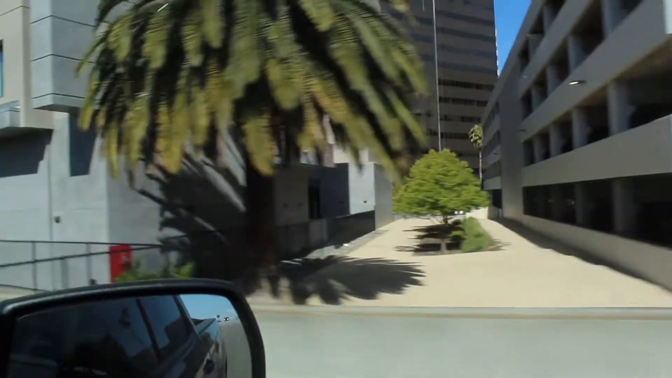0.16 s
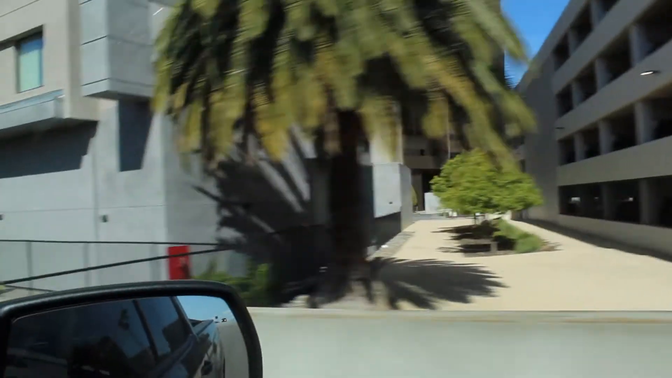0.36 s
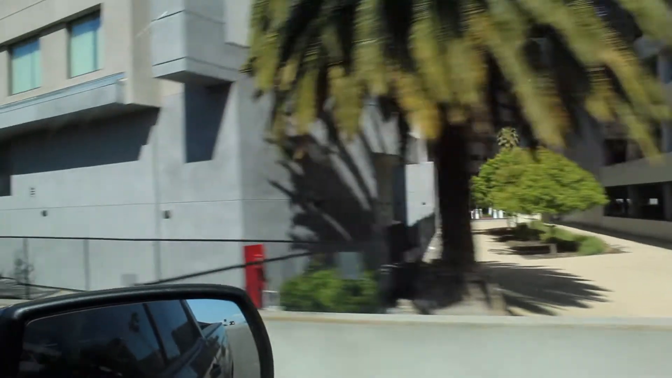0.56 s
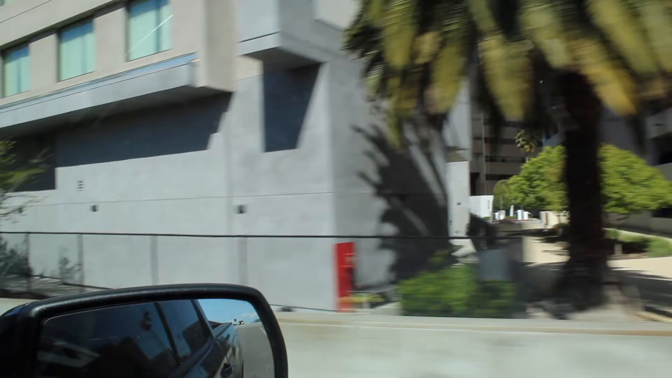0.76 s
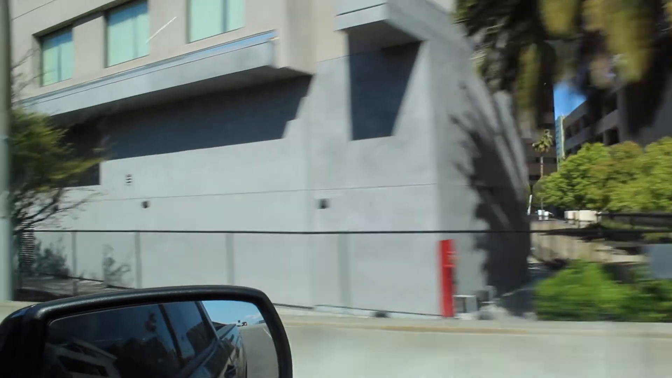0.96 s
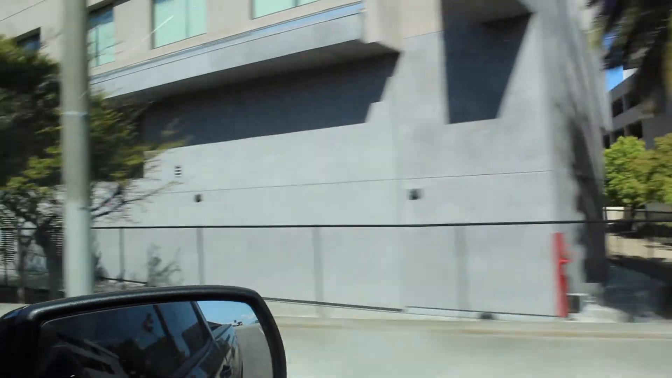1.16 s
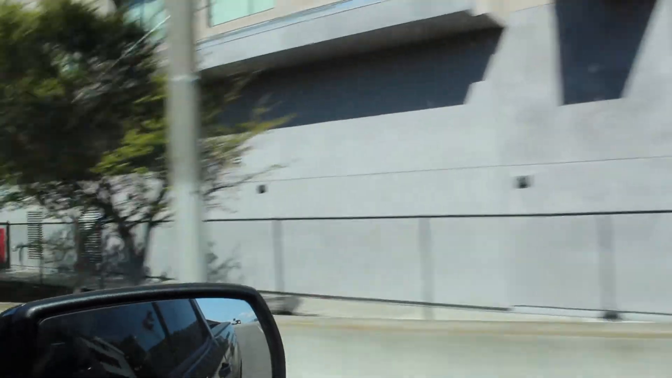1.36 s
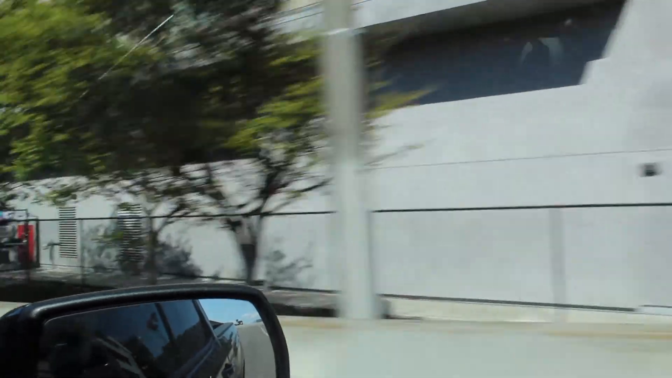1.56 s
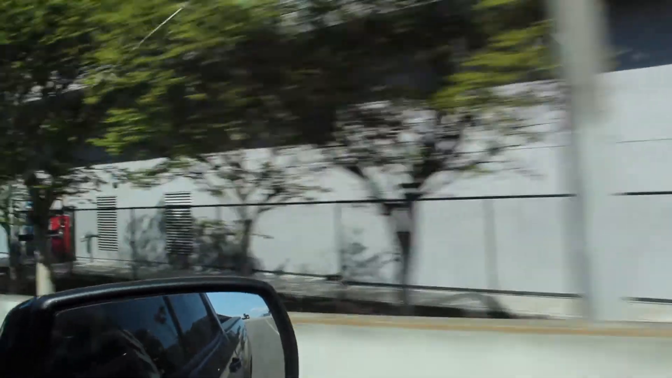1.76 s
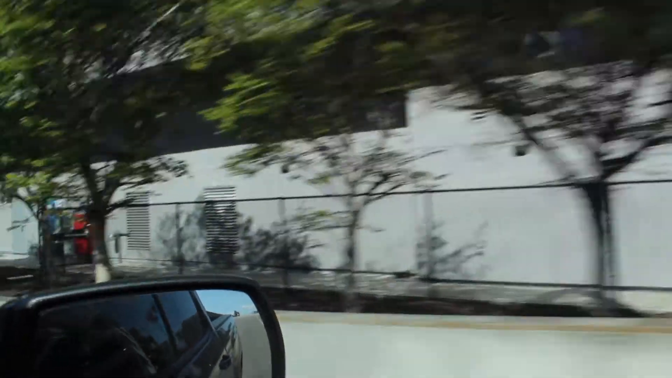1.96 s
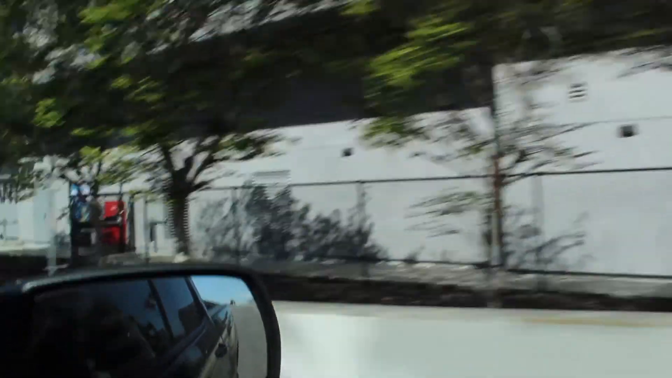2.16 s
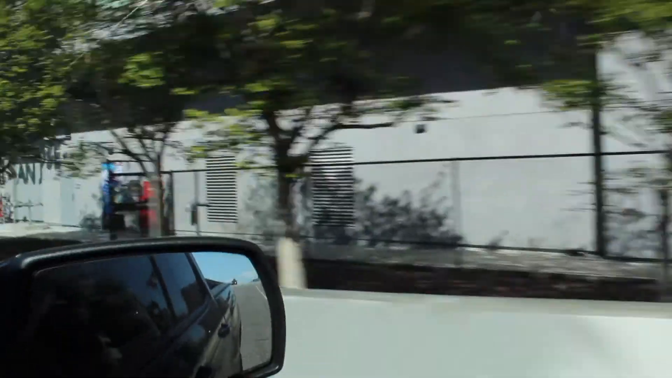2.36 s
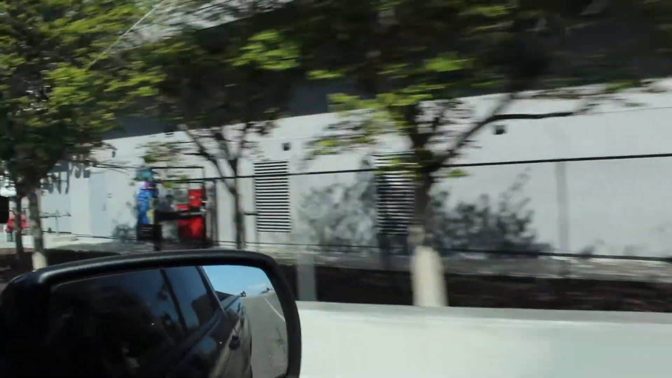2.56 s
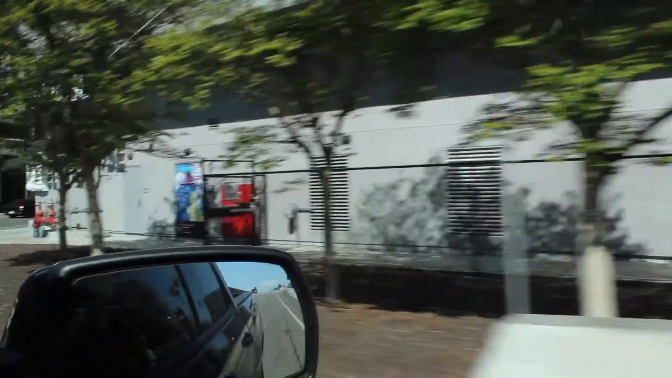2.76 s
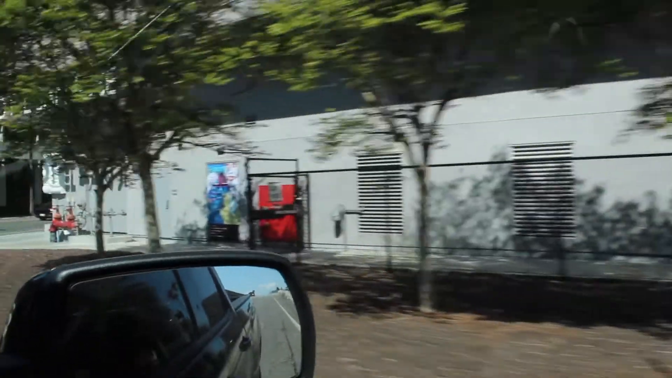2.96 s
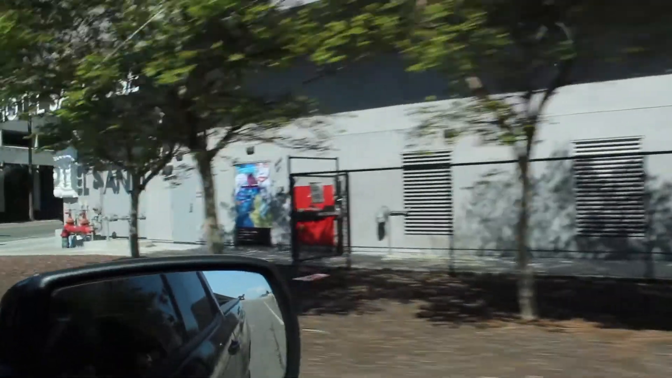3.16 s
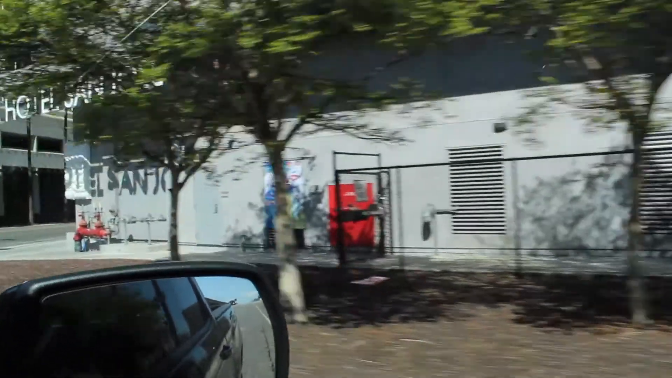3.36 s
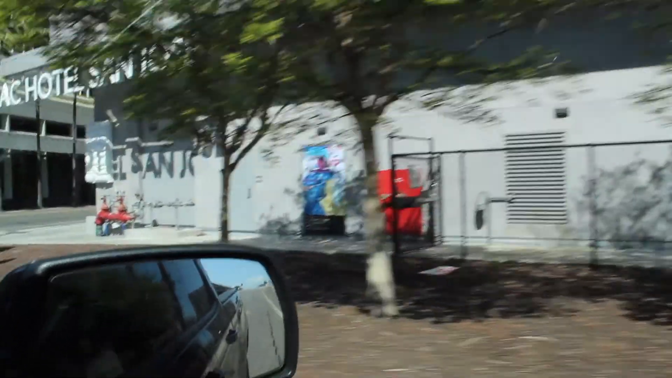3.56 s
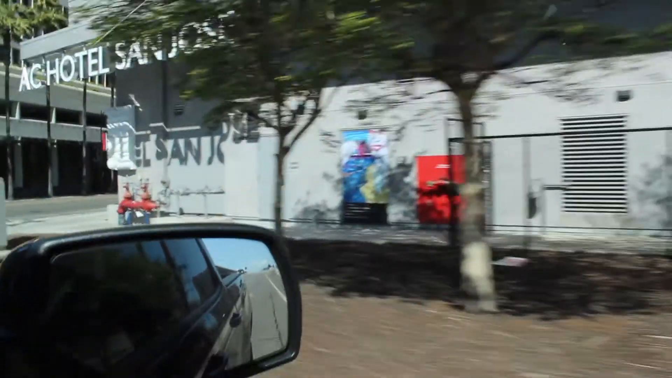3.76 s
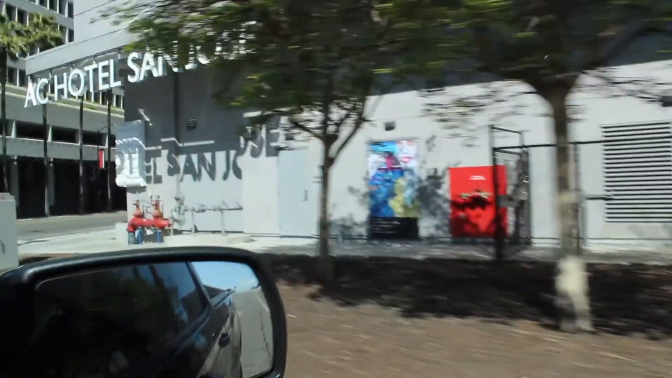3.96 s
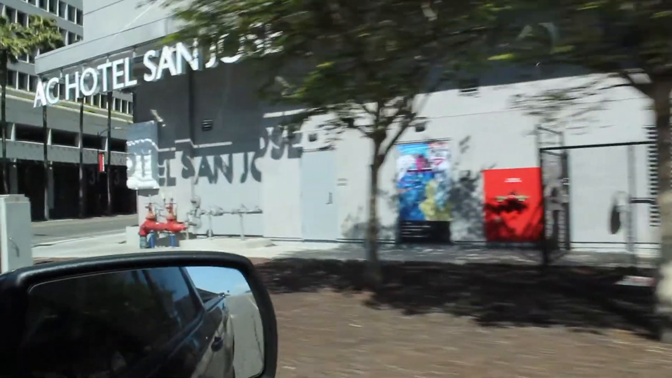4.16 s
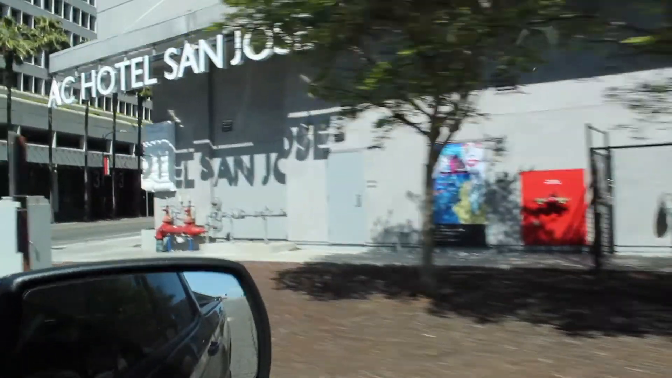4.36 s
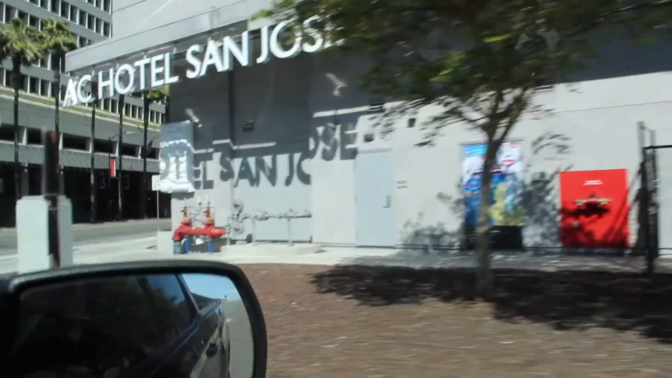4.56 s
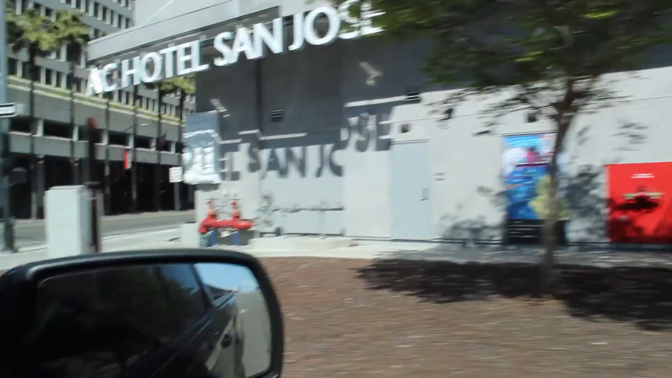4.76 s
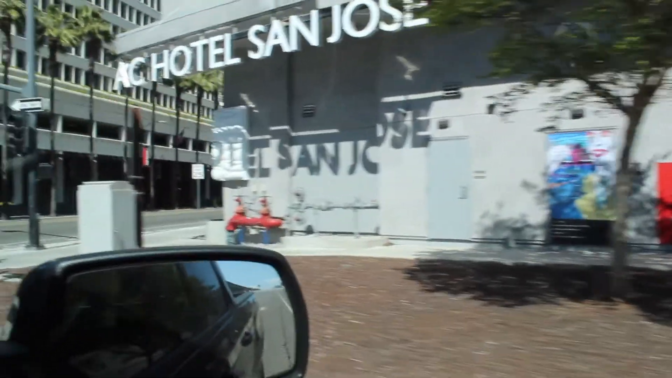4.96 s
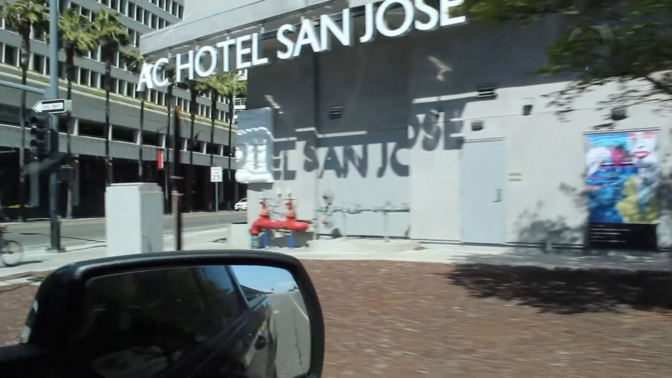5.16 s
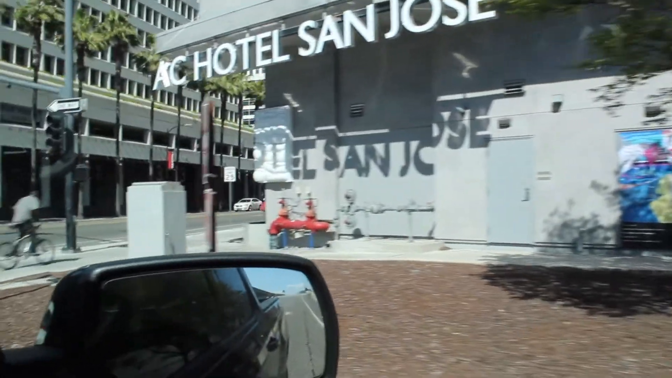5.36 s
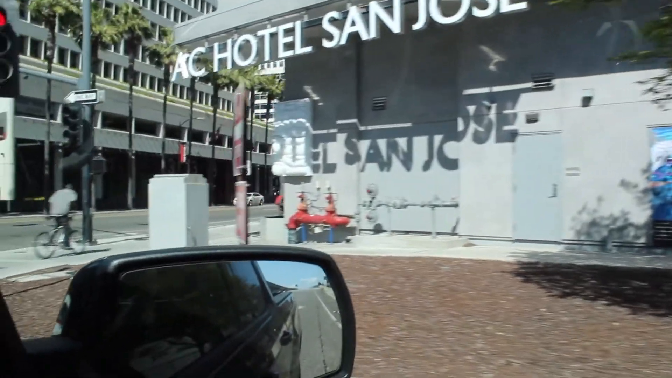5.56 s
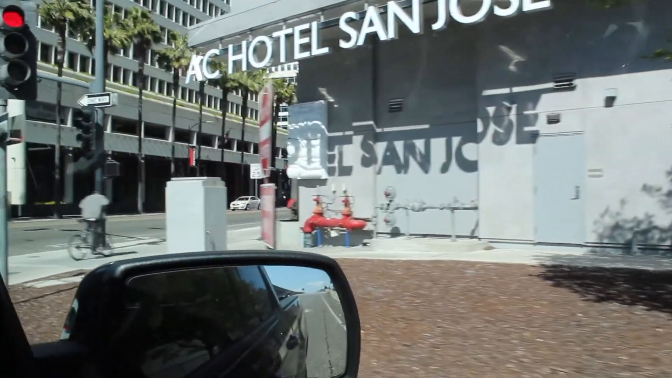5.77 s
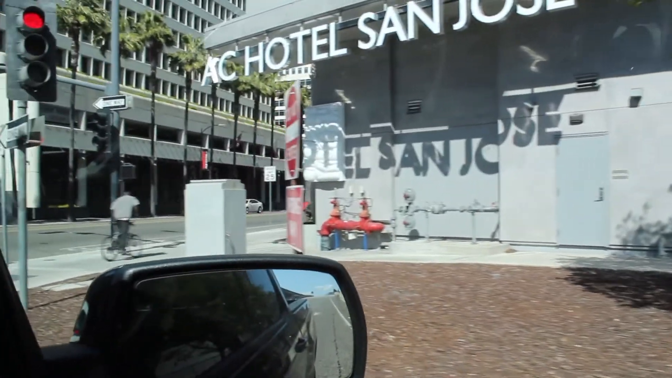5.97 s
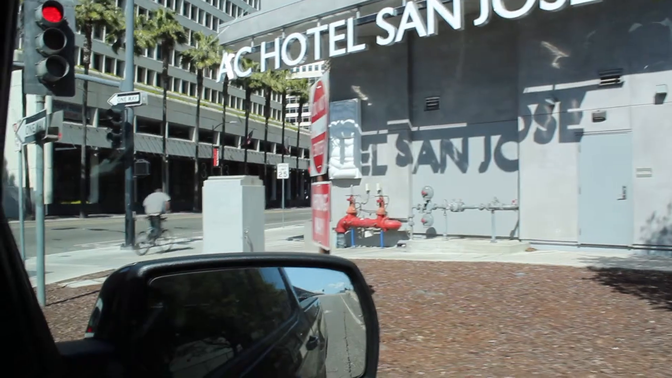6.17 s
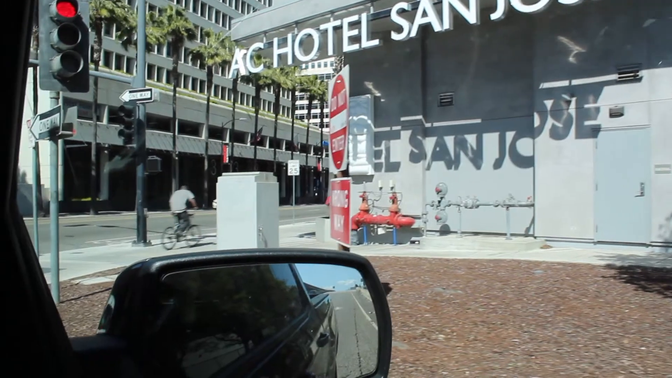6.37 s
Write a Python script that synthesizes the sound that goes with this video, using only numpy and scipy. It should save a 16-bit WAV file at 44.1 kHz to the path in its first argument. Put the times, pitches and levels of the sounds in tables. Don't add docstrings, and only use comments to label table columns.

```python
import sys
import numpy as np
from scipy import signal
from scipy.io import wavfile
from scipy.ndimage import uniform_filter1d

SR = 44100
rng = np.random.default_rng(int(sys.argv[2]) if len(sys.argv) > 2 else 0)


def amplitude_ratio(level_db):
    exponent = np.asarray(level_db, float) / 20
    return 10 ** exponent


def transcribe(u):
    v = np.clip(np.atleast_2d(u).T, -1, 1)
    q = np.round(v * 32767).astype(np.int16)
    wavfile.write(sys.argv[1], SR, q)


N = 282945

# start_s [s], level_db [dB]
SPEED = [
    (0, 1),
    (1.0, 0),
    (2.0, -3),
    (3.0, -6.5),
    (4.0, -10.5),
    (5.0, -16.5),
    (5.7, -19),
    (6.42, -23.5),
]

# pitch_hz [Hz], width_hz [Hz], level_db [dB]
BODY_MODES = [(40.5, 4.3, -3), (25.8, 14, -6), (36.4, 4.2, -13)]
FLOOR_MODES = [(82.44, 9.5, -4), (69, 20.7, -9.5)]
CABIN_MODES = [(133.5, 27.8, 7.5), (110.3, 21.2, 3), (154.2, 12.4, -7)]
TYRE_MODES = [(182.7, 29.4, 1.5), (239.1, 19, -2), (264.5, 56, -8)]
ENGINE_MODES = [(24, 8, -12), (90, 38, -3), (144.3, 38, 2), (250, 67, -6.5)]

# start_s [s, centre], lift_db [dB], length_s [s]
BODY_PATCHES = [(0.145, 4, 0.16), (0.333, 5, 0.19), (0.87, 2.5, 0.145), (1.433, 6.5, 0.088),
                (1.648, 1, 0.079), (1.828, 11, 0.08), (1.988, 9, 0.52), (2.268, 8, 0.116),
                (3.342, 9.5, 0.097), (3.496, 8, 0.052), (3.648, 8.5, 0.261), (4.317, 10, 0.053),
                (4.413, 4, 0.27), (4.707, 8, 0.083), (4.9, 7, 0.36), (5.507, 8, 0.21)]
FLOOR_PATCHES = [(0.075, 3, 0.077), (0.36, 5, 0.1), (0.643, 2.5, 0.09), (0.944, 5.5, 0.14),
                 (1.574, 8.5, 0.11), (2.307, 6, 0.32), (2.878, 8, 0.39), (2.989, 3, 0.054),
                 (3.167, 9.5, 0.34), (4.08, 8.0, 0.25), (4.448, 5.5, 0.47), (5.37, 6, 0.23),
                 (5.63, 5.3, 0.2), (5.964, 1, 0.149), (6.091, -2, 0.066), (6.317, 6, 0.135)]
AIR_PATCHES = [(0.42, 3.5, 0.17), (0.542, 6.1, 0.051), (1.277, 3, 0.14), (1.379, 3.5, 0.044),
               (2.82, 3, 0.094), (3.014, 6.5, 0.075), (3.265, 8.5, 0.09), (3.892, 5.5, 0.11),
               (4.193, 2.5, 0.05), (4.62, 2.5, 0.16), (4.808, 7, 0.06), (5.1, 6.8, 0.043),
               (5.256, 8, 0.068), (5.65, 7, 0.072), (5.974, 6.5, 0.26), (6.353, 10.5, 0.096)]
TYRE_PATCHES = [(0.094, 4.0, 0.33), (0.24, 4.5, 0.046), (0.407, -0.5, 0.036), (1.019, 5.5, 0.062),
                (1.351, 2.5, 0.094), (2.19, 8, 0.028), (2.482, 4.5, 0.12), (2.94, 3, 0.19),
                (3.039, -1, 0.044), (3.268, -2.5, 0.12), (3.58, 1, 0.058), (3.93, 1.5, 0.13),
                (4.352, 5, 0.054), (4.735, 3, 0.129), (4.98, 3.5, 0.42), (6.2, 7, 0.69)]
GRIT_PATCHES = [
    (0.238, 5.5, 0.059),
    (0.8, 5, 0.14),
    (1.06, 5, 0.093),
    (3.82, 1, 0.23),
    (4.443, 1.5, 0.11),
]

# pitch_hz [Hz], level_db [dB per Hz]
ROAR_SPECTRUM = [(150, -6), (300, 1.5), (400, -3), (470, 3), (600, -12), (720, -3), (950, -17), (1500, -23),
                 (3000, -37.5), (12000, -58)]
BLOWER_SPECTRUM = [(200, -1), (320, -12.5), (420, -4.5), (600, -3), (900, -0.5), (1400, -4), (2100, -5),
                   (2600, -9), (3500, -19), (4100, -19), (6500, -30), (10000, -32.5), (11800, -55.5),
                   (15500, -54.5)]
CLOTH_SPECTRUM = [(2500, -8.5), (5000, 6), (8000, 2.5), (10500, 4.5), (12000, -2.5), (14500, -1.5),
                  (16500, -8)]
# pitch_hz [Hz], width_hz [Hz], level_db [dB]
DUCT_MODES = [(465, 65, -3), (514.5, 48, 7.5), (707, 89, -0.5), (1087, 73, 2), (1153, 220, -4.5),
              (1807, 200, -5.5), (2049, 23.5, 5), (2136, 94, -13), (3300, 310, -2), (3340, 200, -4.5),
              (4470, 150, -12.5), (5600, 990, -19.5), (10400, 760, -6)]

# start_s [s, at the peak], level_db [dB, peak], rise_s [s], fall_s [s]
RUBS = [
    (.35, -69, 0.071, .15),
    (.75, -77, .1, .1),
    (2.06, -69, .06, .08),
    (3.1, -72.5, 0.51, .35),
    (3.93, -58, .06, .015),
    (4.23, -64.5, 0.18, .15),
    (4.79, -64, .14, .08),
    (5.02, -65.5, 0.13, 0.045),
    (5.28, -72, .06, .12),
    (5.65, -69, .12, .1),
]
# [dB, below 6 kHz]
TICKS = [(.018, -53, .004, -14), (0.1263, -32, .0098, -1), (.140, -45.5, .015, 5), (.3122, -47, .0067, -4),
         (.3366, -37, .0093, -5), (0.361, -36.5, .0064, 0), (0.385, -29, .0062, -6.5),
         (.3984, -50, .0072, -2), (.4973, -50, .004, -4), (.5484, -55, .004, -4), (.634, -48, .008, -8),
         (.697, -54, .004, -12), (.843, -56, .004, 8), (1.067, -50, .0044, -10), (1.32, -56, .004, -12),
         (1.42, -55, .004, -11), (2.0607, -45, .006, -13), (2.0732, -44.5, .006, -8),
         (2.5301, -51, 0.0034, -10), (3.3228, -50, .0036, -8), (4.096, -50, .004, -11),
         (4.2098, -52, .005, -6)]

# start_s [s], level_db [dB, peak], contact_s [s]
KNOCKS = [
    (2.3799, -16.5, 0.0002),
]
TAPS = [
    (3.0190, -23, 0.00067),
    (3.0238, -30, 0.0028),
    (3.9128, -28.5, .0012),
    (3.918, -35, .002),
]
SNAPS = [
    (4.1188, -14, 0.00033),
    (4.128, -23, .0006),
    (4.135, -46, .001),
]
# pitch_hz [Hz], level_db [dB], t60_s [s]
KNOCK_MODES = [(1150, 12, 0.024), (1440, 9, 0.015), (1820, 8, 0.015), (2030, 3, 0.012),
               (4500, -4.5, 0.0075), (5530, -3, .010), (6960, -17, .006), (8900, -4, 0.0033),
               (10000, -3, 0.0045), (12300, -12, .004), (14000, -19, .004)]
TAP_MODES = [(1850, -7, .015), (1840, -1, 0.022), (3100, -4, 0.014), (3400, -1, 0.0086),
             (3800, -3.5, 0.008), (4900, -11, 0.011), (6000, -13, 0.0055), (7460, -20, 0.0055),
             (9740, -19, .007), (12100, -21, .012)]
SNAP_MODES = [(2130, -18, .008), (3000, -20, .005), (4170, -11, 0.0083), (4750, -9, .008),
              (5730, -10.5, 0.0067), (6300, -13, .005), (7900, -17, .004), (8700, 2.5, 0.0042),
              (10200, -6.5, 0.0025), (10940, -1, .0039), (11600, -23, .014), (14150, -13, 0.0034)]


def rms_one(x):
    return x / np.sqrt(np.mean(x ** 2) + 1e-20)


def resonate(x, hz, width_hz):
    r = np.exp(-np.pi * width_hz / SR)
    feedback = [1, -2 * r * np.cos(2 * np.pi * hz / SR), r * r]
    return signal.lfilter([(1 - r * r) / 2, 0, (r * r - 1) / 2], feedback, x)


def bandpass(x, low_hz, high_hz):
    return signal.sosfilt(signal.butter(2, [low_hz, high_hz], "band", fs=SR, output="sos"), x)


def drift(rate_hz):
    step = 40
    r = np.exp(-2 * np.pi * rate_hz * step / SR)
    slow = signal.lfilter([1], [1, -2 * r, r * r], rng.standard_normal(N // step + 2002))
    slow = rms_one(slow[2000:])
    return np.interp(np.arange(N) / step, np.arange(len(slow)), slow)


def banded_noise(spectrum, patchy_db):
    pitch_hz, density_db = np.transpose(spectrum)
    edges = 120 * 2 ** np.arange(0, 7.2, 1 / 3)
    together = drift(4.0)
    white = rng.standard_normal((2, N))
    out = 0
    for k, (low, high) in enumerate(zip(edges, edges[1:])):
        band = bandpass(white[k % 2], low, high)
        level_db = np.interp(np.log(low * high) / 2, np.log(pitch_hz), density_db)
        flicker_db = patchy_db * (0.49 * together + drift(16.0))
        out = out + band * amplitude_ratio(level_db + flicker_db)
    return rms_one(out)


def on_road(start_db, follows, patches, lift=1):
    s, lift_db, length_s = np.transpose(patches)[:, :, None]
    coarse = np.arange(0, N, 64) / SR
    swell_db = np.max(lift_db * 2.0 ** (-(2 * (coarse - s) / length_s) ** 2), axis=0)
    t = np.arange(N) / SR
    speed_db = np.interp(t, *np.transpose(SPEED))
    return start_db + follows * speed_db + lift * np.interp(t, coarse, swell_db)


def shaken_modes(modes, level_db, even, even_s):
    lead = SR // 2
    rung = 0
    for hz, width_hz, db in modes:
        push = rng.standard_normal(N + lead)
        once = resonate(push, hz, 1.47 * width_hz)
        rung = rung + amplitude_ratio(db) * rms_one(resonate(once, hz, 1.47 * width_hz))
    rung = rung[lead:]
    size = int(even_s * SR)
    power = uniform_filter1d(uniform_filter1d(rung ** 2, size=size), size=size)
    swell = np.sqrt(power + 1e-9)
    return amplitude_ratio(level_db) * rms_one(rung / swell ** even)


def road_rumble():
    body = shaken_modes(BODY_MODES, on_road(-23.5, 0.86, BODY_PATCHES), even=0.75, even_s=0.072)
    floor = shaken_modes(FLOOR_MODES, on_road(-23.5, 0.89, FLOOR_PATCHES), even=0.7, even_s=0.092)
    air = shaken_modes(CABIN_MODES, on_road(-20, 0.92, AIR_PATCHES), even=0.66, even_s=0.042)
    tyres = shaken_modes(TYRE_MODES, on_road(-25, 0.9, TYRE_PATCHES), even=0.42, even_s=0.07)
    return body + floor + air + tyres


def engine():
    return shaken_modes(ENGINE_MODES, -35.5, even=0.2, even_s=0.05)


def tyre_roar():
    return amplitude_ratio(on_road(-32.5, 0.93, GRIT_PATCHES)) * banded_noise(ROAR_SPECTRUM, patchy_db=0.5)


def blower():
    level_db = on_road(-37.5, 0.21, GRIT_PATCHES, lift=0.14)
    air = banded_noise(BLOWER_SPECTRUM, patchy_db=0.56)
    ducts = sum(amplitude_ratio(db) * resonate(air, hz, width_hz) for hz, width_hz, db in DUCT_MODES)
    return amplitude_ratio(level_db) * rms_one(air + ducts)


def cloth():
    rest_db = -74
    t = np.arange(N) / SR
    power = amplitude_ratio(2 * rest_db)
    for s, db, rise_s, fall_s in RUBS:
        side_s = np.where(t < s, rise_s, fall_s)
        power = power + amplitude_ratio(2 * db) * np.exp(-((t - s) / side_s) ** 2)
    return np.sqrt(power) * banded_noise(CLOTH_SPECTRUM, patchy_db=0.05)


def burst(grit, hold_s, t60_s):
    age = np.arange(len(grit)) / SR
    return grit * amplitude_ratio(-60 * np.clip(age - hold_s, 0, None) / t60_s)


def add(out, s, peak_db, sound):
    at = round(s * SR)
    out[at:at + len(sound)] += amplitude_ratio(peak_db) * sound[:len(out) - at] / np.abs(sound).max()


def ticks():
    out = np.zeros(N)
    for s, db, rub_s, dull_db in TICKS:
        force = burst(rng.standard_normal(3000), rub_s, t60_s=0.039)
        bright = bandpass(force, 6800, 14500)
        dull = bandpass(force, 3000, 6500)
        add(out, s, db - 2.5, bright - amplitude_ratio(dull_db) * dull)
    return out


def ring(force, hz, t60_s):
    r = amplitude_ratio(-60 / (t60_s * SR))
    w = 2 * np.pi * hz / SR
    return signal.lfilter([0, np.sin(w)], [1, -2 * r * np.cos(w), r * r], force)


def struck(hits, modes, late_cycles):
    out = np.zeros(N)
    no_bass = signal.butter(4, 900, "high", fs=SR, output="sos")
    for s, db, contact_s in hits:
        force = 0.12 * burst(rng.standard_normal(3000), contact_s, t60_s=0.006)
        force[0] += 1
        sound = 0
        for hz, mode_db, t60_s in modes:
            delay = int(late_cycles * SR / hz)
            sound = sound + np.roll(amplitude_ratio(mode_db) * ring(force, hz, t60_s), delay)
        add(out, s, db, signal.sosfilt(no_bass, sound))
    return out


def plastic_parts():
    knocks = struck(KNOCKS, KNOCK_MODES, late_cycles=0.7)
    taps = struck(TAPS, TAP_MODES, late_cycles=0.43)
    snaps = struck(SNAPS, SNAP_MODES, late_cycles=1.9)
    return knocks + taps + snaps


def cabin(x):
    scatter = amplitude_ratio(-35.5) * burst(rng.standard_normal(3000), 0.0017, t60_s=0.03)
    return x + signal.fftconvolve(x, scatter)[:N]


def scene():
    driving = road_rumble() + engine() + tyre_roar()
    near = cloth() + ticks() + cabin(plastic_parts())
    return (driving + blower() + near)[None, :]


def roll_off(x):
    return signal.sosfilt(signal.butter(12, 15600, fs=SR, output="sos"), x)


def record(dry):
    fade_in_s = 0.0014
    x = dry * np.minimum(np.arange(N) / SR / fade_in_s, 1)
    x = signal.sosfilt(signal.butter(2, 15, "high", fs=SR, output="sos"), x)
    x = x - 0.6 * resonate(x, 11350, width_hz=150)
    x = signal.sosfilt(signal.cheby2(12, 50, 15900, fs=SR, output="sos"), x)
    return roll_off(x)


dry = scene()
out = record(dry)
transcribe(out)
```